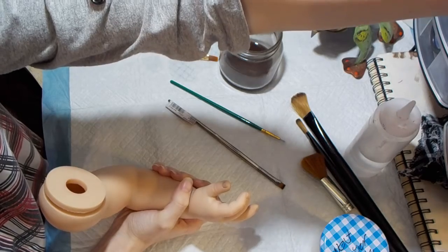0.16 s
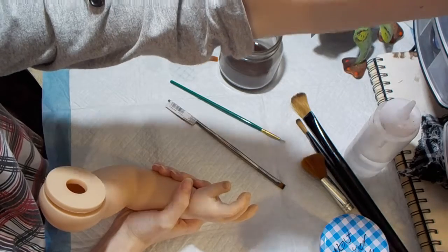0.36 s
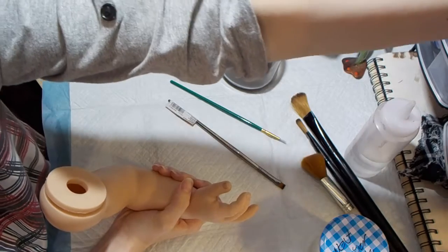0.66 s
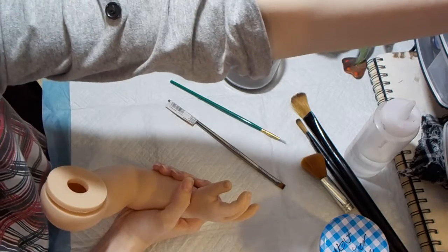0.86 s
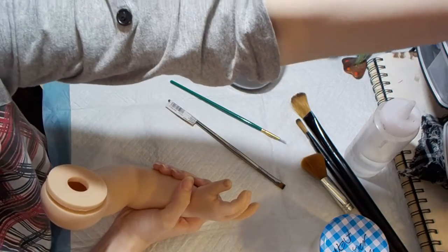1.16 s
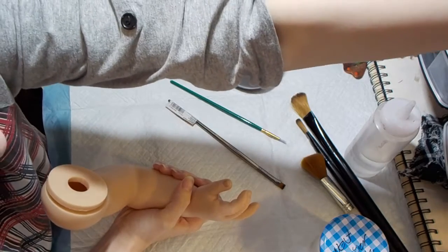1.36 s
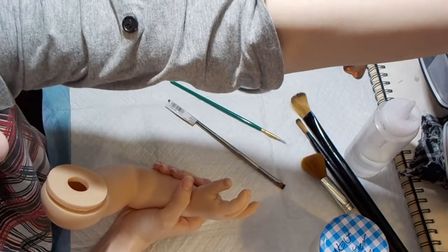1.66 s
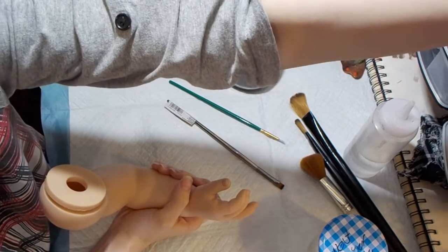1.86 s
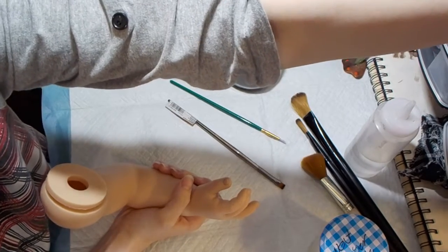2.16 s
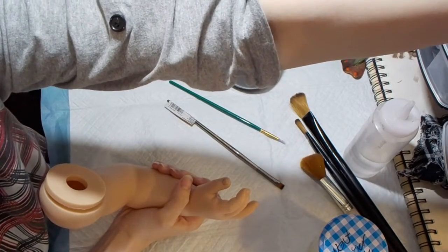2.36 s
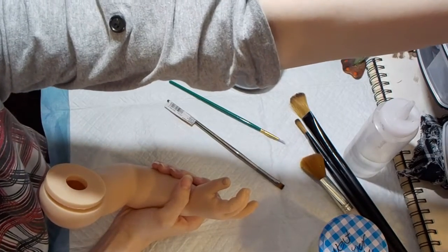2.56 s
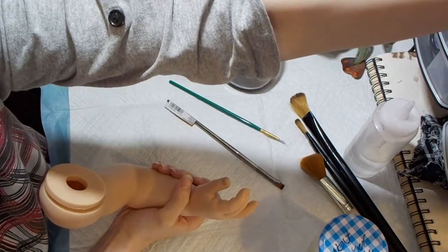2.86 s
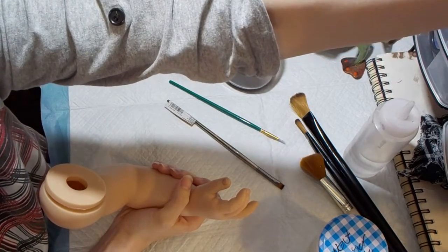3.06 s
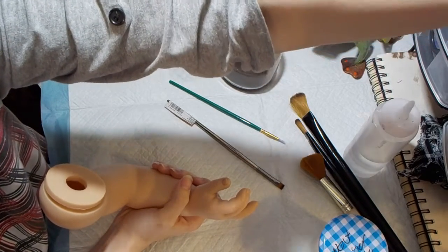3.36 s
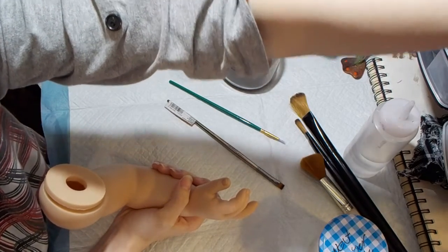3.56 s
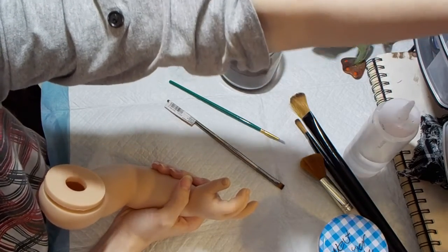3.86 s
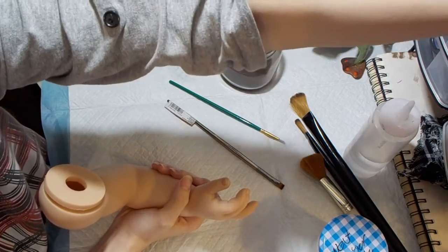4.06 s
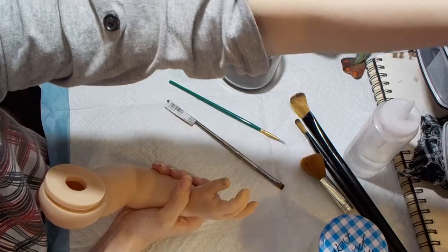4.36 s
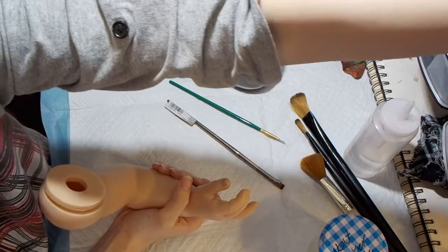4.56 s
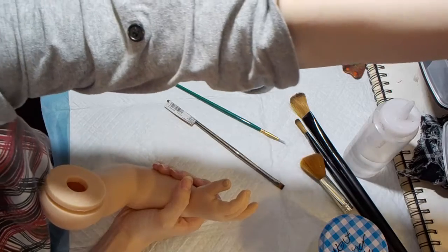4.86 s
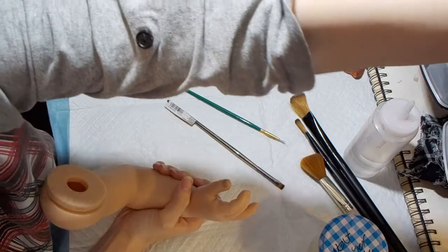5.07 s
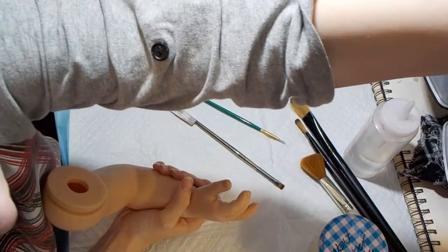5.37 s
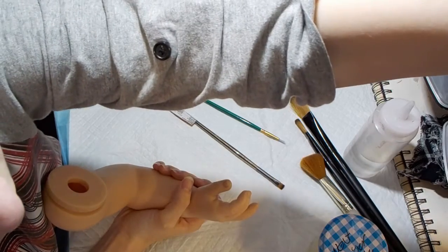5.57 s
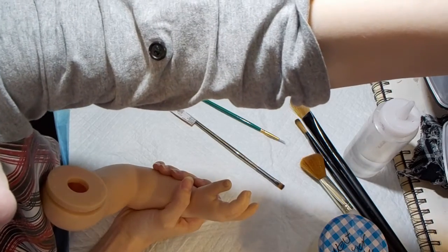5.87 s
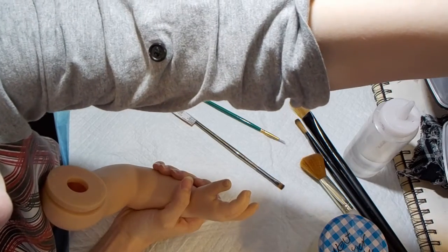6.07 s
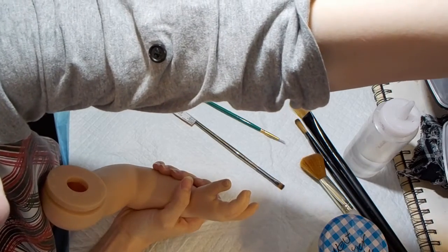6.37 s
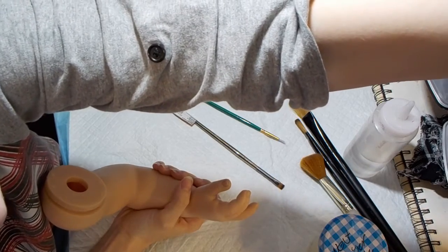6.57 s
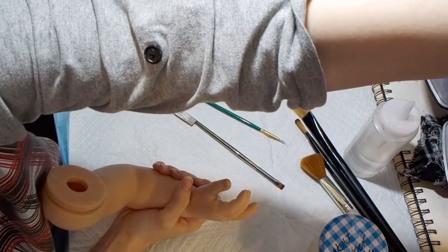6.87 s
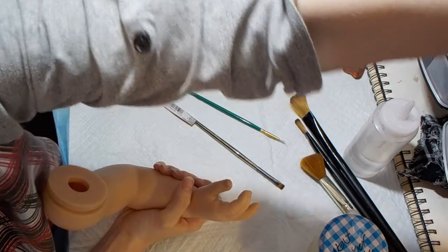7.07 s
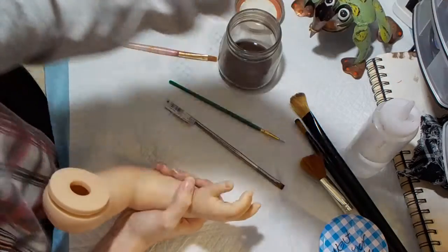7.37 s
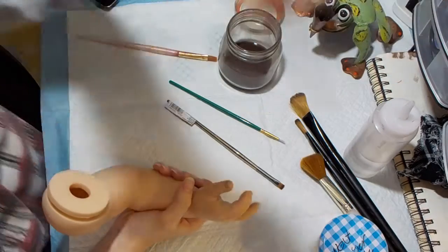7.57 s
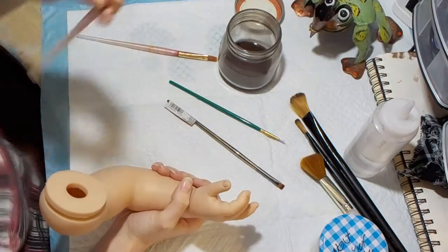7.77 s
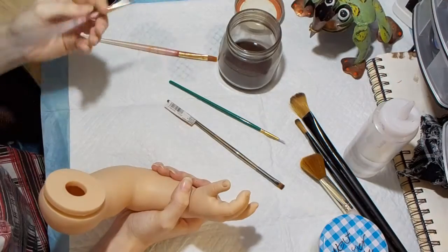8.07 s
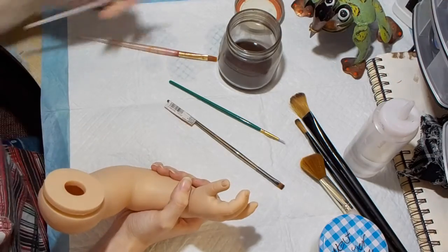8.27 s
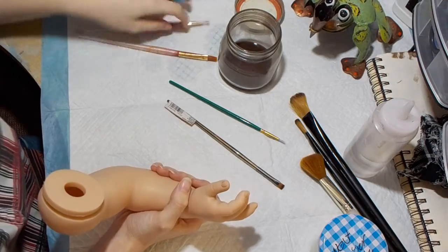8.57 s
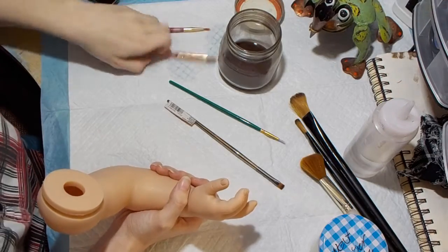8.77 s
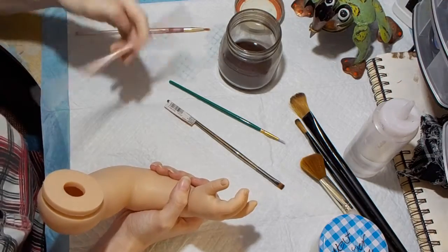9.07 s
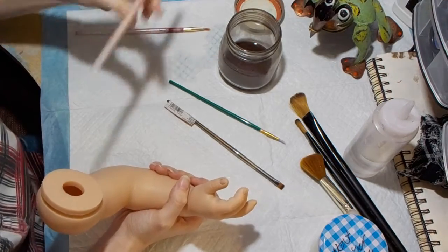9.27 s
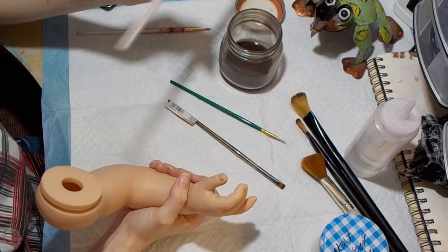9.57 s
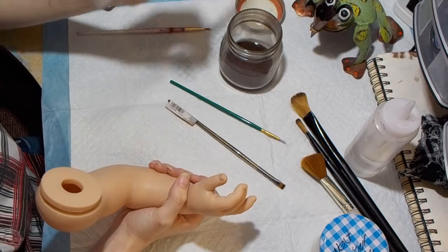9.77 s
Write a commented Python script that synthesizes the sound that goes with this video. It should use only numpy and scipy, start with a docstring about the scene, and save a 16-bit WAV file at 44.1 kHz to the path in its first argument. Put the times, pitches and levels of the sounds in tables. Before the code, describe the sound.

A stick clinks and scrapes inside a small glass jar, with wooden brush handles knocking and rolling on a table.

```python
"""A stick stirs paint in a small glass jar on a padded table, close to a phone in a quiet room.
Its touches ring the paint-damped glass and the filled body; its strokes scrape them by stick-slip.
Brush handles knock and roll on the table top, a metal brush collar ticks, the jar bumps the pad once
and a hand brushes the pad. Short echoes, steady hiss and a faint hum lie behind."""
import sys
import numpy as np
from scipy import signal
from scipy.io import wavfile
from scipy.ndimage import uniform_filter1d

SR = 44100
rng = np.random.default_rng(int(sys.argv[2]) if len(sys.argv) > 2 else 0)


def unload_audio(sound):
    """Save the sound as a 16-bit wav file, at the path given as the first command line argument."""
    columns = np.transpose(np.atleast_2d(sound))
    # keep every value between -1 and 1, then stretch to whole-number steps
    steps = np.round(np.clip(columns, -1, 1) * 32767)
    wavfile.write(sys.argv[1], SR, steps.astype(np.int16))


N = 437031

# Mode tables: (frequency [Hz], t60 [s], level [dB], left-right [dB], left lead [rad])
GLASS_MODES = [(3690, 0.007, -0.5, 8.5, 0.38), (3874, 0.017, -6, -7, -0.9),
               (4092, 0.016, -7.5, -9.5, 0.041), (4460, .02, -21, -3.5, .2), (5150, 0.0096, -13, -9, .3),
               (5358, 0.013, -16.5, 3.5, -0.014), (5730, 0.016, -16, -3, 0.5),
               (6498, 0.014, -17.5, 2, -0.5), (6997, 0.011, -13.5, -3, -0.15)]  # jar wall
BODY_MODES = [(667, 0.039, -7, 0.093, 0.0035), (1065, 0.025, -1, 0.041, 0.0035),
              (1384, 0.02, -0.5, .5, 0.00093), (2040, 0.011, 4, 0.082, 0.0013)]  # filled jar
TICK_MODES = [(9550, 0.0026, 1, -1, .6), (11800, 0.002, -5, -1, 0.4)]  # bright onset of a touch on glass
TABLE_MODES = [(240, .5, -39, 10.5, .8), (383, 0.037, -12, 13.5, 1), (602.7, 0.02, -7.5, 5, -0.047),
               (835, 0.026, -8.5, 8, -1.9), (1068, 0.018, -7.5, 9.5, -1.5), (1406, 0.013, -12.5, 2, -.4),
               (1595, 0.0048, 7.5, 7, 0.45), (3700, 0.0076, -14.5, -13.5, -0.4)]  # table top


def gain_of(db):
    return 10 ** (np.asarray(db) / 20)


def unit_rms(x):
    return x / np.sqrt(np.mean(x ** 2) + 1e-20)


def smooth_noise(width_samples):
    return unit_rms(uniform_filter1d(rng.standard_normal(N), width_samples))


def curve_at(points, hz):
    points_hz, values = np.transpose(points)
    return np.interp(np.log(hz + 1), np.log(points_hz + 1), values)


def octaves_above(modes, hz):
    return np.log2(np.array(modes)[:, :1] / hz)


def add(mix, start_s, sound):
    part = mix[:, round(start_s * SR):][:, :sound.shape[1]]
    part += sound[:, :part.shape[1]]


def ring(modes, samples=2500):
    """Stereo impulse response per mode: builds over a few cycles, then decays."""
    hz, t60_s, db, pan_db, lead_rad = np.transpose(modes)[:, :, None]
    t, side = np.arange(samples) / SR, np.array([.5, -.5])[:, None, None]
    rise = (1 - np.exp(-t * hz * 1.3)) ** 2
    level = gain_of(db + side * pan_db - 60 * t / t60_s)
    return rise * np.sin(2 * np.pi * hz * t + side * lead_rad) * level


def blow(rings, force, peak_db, spot_db=0):
    """A contact force rings the modes, weighted by the struck spot."""
    sound = signal.fftconvolve((rings * gain_of(spot_db)).sum(1), force[None], axes=1)
    return gain_of(peak_db) * sound / abs(sound.mean(0)).max()


def contacts(events, t60_s, chatter, db_per_db):
    """Force per event: unit impulse, then dying slips that scale with event level by db_per_db."""
    levels_db = np.array(events)[:, 1:2]
    noise, spread = rng.standard_normal((len(events), 2, 2500)).transpose(1, 0, 2)
    t, stretch = np.arange(2500) / SR, rng.uniform(.6, 1.15, (len(events), 1))
    force = chatter * noise * gain_of(4 * spread - 60 * t / (t60_s * stretch) + db_per_db * levels_db)
    force[:, 0] = 1
    return force


def pressure(strokes, lift_off_db=-71, roundness=1.56):
    """Each stroke swells from lift-off to its peak and sinks back."""
    t, out = np.arange(N) / SR, np.zeros(N)
    for start_s, length_s, db, rise in strokes:
        part = slice(round(start_s * SR), round((start_s + length_s) * SR))
        corners_s = start_s + length_s * np.array([0, np.clip(rise, .02, .98), 1])
        off_peak = np.interp(t[part], corners_s, [1, 0, 1])
        out[part] += gain_of(db + (lift_off_db - db) * off_peak ** roundness) - gain_of(lift_off_db)
    return out


def rub(level, mode_sets, clump_samples, ring_samples=2500):
    """Dense stick-slip grains in clumps of a few ms drive the modes."""
    clump_db = 6 * np.minimum(smooth_noise(clump_samples), 1.5)
    slips = unit_rms(rng.standard_normal(N) * gain_of(4.5 * rng.standard_normal(N) + clump_db))
    response = 0
    for modes, db in mode_sets:
        shape = ring(modes, ring_samples).sum(1)
        response = response + gain_of(db) * shape / np.linalg.norm(shape.mean(0))
    return signal.oaconvolve((slips * level)[None], response, axes=1)[:, :N]


def room_tone(hiss_db=-64, hum_db=-82.5, hum_hz=370):
    """Hiss of room and electronics with a faint wavering hum."""
    spectrum = [(30, -1), (70, -9), (130, -1.5), (200, -8), (330, -3.5), (1000, -1.5), (4000, -5.5),
                (5500, -12), (16000, -14.5)]  # hiss: (frequency [Hz], level [dB])
    coherence = [(60, 0.94), (240, 0.57), (950, 0.46), (3770, 0.24), (15000, -0.33)]  # left-right likeness: (frequency [Hz], correlation [-1..1])
    frames, hz = N // 256 + 5, np.fft.rfftfreq(1024, 1 / SR)
    left_re, left_im, other_re, other_im, patches = rng.standard_normal((frames, 513, 5)).T
    patches = unit_rms(uniform_filter1d(uniform_filter1d(patches, 12, 0), 14, 1))
    waver_db = 0.62 * patches * (hz[:, None] < 7000)  # the electronic hiss above is even
    alike = curve_at(coherence, hz)[:, None]
    left = left_re + 1j * left_im
    right = alike * left + np.sqrt(1 - alike ** 2) * (other_re + 1j * other_im)
    bins = np.array([left, right]) * gain_of(curve_at(spectrum, hz)[:, None] + waver_db)
    hiss = unit_rms(signal.istft(bins, nperseg=1024, noverlap=768)[1][:, :N])
    hum = gain_of(hum_db + smooth_noise(3000)) * np.sin(2 * np.pi * hum_hz * np.arange(N) / SR)
    return gain_of(hiss_db) * hiss + hum


def echoes(x, t60_s):
    """Sparse reflections of random sign from table, arm and walls."""
    taps = np.zeros((2, 9000))
    delays = np.arange(150, 8980, 20) + rng.integers(0, 20, (2, 442))
    np.put_along_axis(taps, delays, rng.choice([-1., 1.], delays.shape), 1)
    taps *= gain_of(-60 * np.arange(9000) / SR / t60_s)
    return signal.oaconvolve(x, taps / np.linalg.norm(taps[0]), axes=1)[:, :N]


def hand(push_t60_s=0.28):
    """Skin rustles over the paper pad; the wrist settles with soft, uneven pushes."""
    strokes = [(8.49, 0.11, -59, 0.64), (8.73, 0.2, -61.5, 0.38)]  # skin on pad: (start [s], length [s], level [dB], rise [fraction])
    thuds = [(8.572, -54), (8.734, -51)]  # wrist on pad: (time [s], level [dB])
    # pad: (frequency [Hz], t60 [s], level [dB], left-right [dB], left lead [rad])
    rustle_modes = [(894, 0.0035, -1.5, 3, .1), (3950, 0.0034, -2, 1, 0.33), (5900, 0.0014, -1, 1, .3)]
    bass_modes = [(121, 0.096, -2.5, 4.4, .1), (182, 0.044, -1.5, 9.1, .1)]
    out = rub(pressure(strokes), [(rustle_modes, 0)], clump_samples=200)
    fade = gain_of(-60 * np.arange(4000) / SR / push_t60_s)
    for (time_s, db), push in zip(thuds, rng.standard_normal((len(thuds), 4000))):
        add(out, time_s, blow(ring(bass_modes), push * fade, db))
    return out


def handle_rolls():
    """Rolling handles drive the table top with fine grains."""
    rolls = [(1.74, 0.17, -40.5, 0.31), (1.89, 0.49, -54, 0.15), (2.03, 0.081, -51.5, 0.71),
             (2.12, 0.14, -50.5, 0.9), (9.207, 0.13, -47.5, 0.1), (9.3, 0.21, -54, 0.39),
             (9.48, 0.11, -50.5, 0.11)]  # handle on table: (start [s], length [s], level [dB], rise [fraction])
    return rub(pressure(rolls), [(TABLE_MODES, 0)], clump_samples=200, ring_samples=14000)


def handle_knocks(t60_cycles=27):
    """Wooden handles chatter on the table, ringing their own note and the table modes near it."""
    knocks = [(1.613, -38, 735), (1.776, -38, 1730), (1.788, -29, 1670), (1.804, -13.5, 1530),
              (1.829, -32, 1780), (1.849, -20.5, 1510), (1.906, -37, 1780), (1.922, -32, 1630),
              (1.937, -11, 1800), (1.991, -45, 665), (2.045, -25, 1580), (2.077, -29.5, 1660),
              (2.162, -35.5, 1140), (2.177, -38.5, 1430), (2.244, -41.5, 583), (2.29, -31, 1370),
              (2.319, -27.5, 1490), (2.373, -25, 1570), (8.502, -53, 716), (8.574, -45, 668),
              (9.214, -19, 1650), (9.222, -22, 898), (9.231, -15, 1590), (9.234, -17, 1530),
              (9.271, -31, 1760), (9.346, -32, 1160), (9.385, -20, 1280), (9.431, -23.5, 1400),
              (9.443, -9, 1650), (9.45, -23, 1550), (9.491, -27, 1700), (9.5, -18.5, 1085),
              (9.507, -27, 852), (9.514, -21.5, 1650), (9.52, -45.5, 542), (9.579, -36.5, 1613)]  # handle on table: (time [s], level [dB], pitch [Hz])
    spots_db = 2 * rng.standard_normal((len(knocks), len(TABLE_MODES), 1))
    forces = contacts(knocks, t60_s=0.014, chatter=0.14, db_per_db=-3.2)
    out, table_top = np.zeros((2, N)), ring(TABLE_MODES, samples=14000)
    for (time_s, db, hz), force, spot_db in zip(knocks, forces, spots_db):
        handle = ring([(hz, t60_cycles / hz, 0, 7, .2)])
        add(out, time_s, blow(handle, force, db - 9.5 + 6 * (hz < 1000)))  # low notes are clearer
        falloff_db = (9.5 + .15 * (db + 24)) * abs(octaves_above(TABLE_MODES, hz))
        add(out, time_s, blow(table_top, force, db - 3, spot_db - falloff_db))
    return out


def collar_ticks():
    """A metal brush collar ticks, hard and dry; snap weights its modes above 9 kHz."""
    ticks = [(1.723, -20.5, 2), (1.936, -36, -26), (2.373, -39, -6), (2.7118, -26, 5), (5.0065, -42, 6),
             (6.2118, -44, 4), (7.2567, -32.5, 6), (8.839, -48, -8.5), (9.0004, -51.5, -7),
             (9.212, -24, -1), (9.364, -37.5, -8), (9.4441, -21.5, -11), (9.5, -38.5, 3)]  # collar touches: (time [s], level [dB], snap [dB])
    # collar: (frequency [Hz], t60 [s], level [dB], left-right [dB], left lead [rad])
    modes = [(3780, 0.0074, 5, -4.5, 0.086), (4924, 0.0045, -6.5, -7, .1), (6620, 0.0079, -8, -3, .2),
             (10690, 0.0012, 1.5, 6, .5), (13000, 0.0013, 4.5, -1.5, .4)]
    out, collar, is_top = np.zeros((2, N)), ring(modes), np.array(modes)[:, :1] > 9000
    forces = contacts(ticks, t60_s=.014, chatter=0.005, db_per_db=-0.78)
    for (time_s, db, snap_db), force in zip(ticks, forces):
        add(out, time_s, blow(collar, force, db, snap_db * is_top))
    return out


def jar_bump():
    """The jar rocks onto the pad; the soft pulse favours its lowest body mode."""
    bumps = [(5.51, -24)]  # base on pad: (time [s], level [dB])
    out, tilt_db = np.zeros((2, N)), -18 * octaves_above(BODY_MODES, BODY_MODES[0][0])
    for time_s, db in bumps:
        add(out, time_s, blow(ring(BODY_MODES), np.hanning(24), db, tilt_db))
    return out


def stick_scrapes(graze_db=-71, graze_end_s=5.75):
    """The dragged stick drives wall, body and a gritty top; while stirring it grazes between strokes."""
    strokes = [(0.03, 0.23, -28.5, 0.43), (.52, 0.27, -37.5, 0.39), (.73, 0.15, -24.5, 0.39),
               (1.237, 0.054, -31.5, 0.62), (1.598, 0.046, -41, 0.76), (1.708, 0.17, -45.5, 0.27),
               (2.688, 0.23, -44, 0.097), (3.19, 0.28, -31, 0.14), (3.27, 0.16, -33, 0.24),
               (3.36, 0.1, -34.5, 0.33), (3.66, 0.22, -41, 0.32), (3.77, 0.15, -28.5, 0.39),
               (4.33, 0.18, -41.5, 0.11), (4.57, 0.16, -43, 0.15), (4.85, 0.18, -50.5, 0.33),
               (5.07, .13, -40, 0.74), (5.18, 0.087, -41.5, 0.48), (5.24, 0.27, -45, 0.22),
               (5.436, 0.16, -34, 0.42), (5.57, 0.14, -48.5, 0.64), (6.208, 0.059, -40.5, 0.1),
               (6.9, .25, -41, 0.8)]  # stick on wall: (start [s], length [s], level [dB], rise [fraction])
    graze = gain_of(graze_db + 9.2 * smooth_noise(1500)) * (np.arange(N) < graze_end_s * SR)
    mode_sets = [(GLASS_MODES, -3), (BODY_MODES, -17), (TICK_MODES[:1], -28)]  # (modes, level [dB])
    return rub(pressure(strokes) + graze, mode_sets, clump_samples=130)


def stick_clinks(rebound_db=-19, rebound_s=0.037):
    """Each touch rings the glass wall at a new spot, the filled body and a short bright tick."""
    touches = [(0.092, -25, -23), (.117, -42, -30), (0.1287, -32, -39), (0.155, -20, -39),
               (0.167, -17, -21), (0.264, -41, -15.5), (0.3313, -42.5, -27), (.5935, -46, -2),
               (0.6094, -14.5, -19), (0.6497, -22, -14.5), (0.7856, -7, -33), (.7872, -5.5, -24),
               (0.7913, -15, -41), (0.7941, -7, -31), (0.926, -32, -17.5), (1.263, -23.5, -20),
               (1.4245, -35.5, -17.5), (1.5132, -42, -14.5), (1.6247, -31.5, -30), (1.679, -37, -15),
               (1.723, -3.5, -30), (1.7585, -16, -28), (2.1925, -43, -8), (2.307, -33, -5),
               (2.498, -36.5, -35), (2.617, -36, -12), (2.665, -37, -16.5), (2.701, -26, -21),
               (2.7105, -4, -43), (2.737, -13.5, -40), (2.751, -17.5, -45), (2.7598, -24.5, -30),
               (3.2498, -25.5, -11.5), (3.268, -17.5, -15.5), (3.3118, -18, -13.5), (3.3272, -14.5, -15.5),
               (3.3963, -20.5, -34), (3.713, -20.5, -28), (3.769, -29, -14), (3.8298, -12, -32),
               (4.188, -37, -15.5), (4.2112, -36.5, -30), (4.2784, -40.5, -6), (4.3068, -40.5, -18),
               (4.342, -26, -14.5), (4.3527, -12, -26.5), (4.377, -29, -31), (4.405, -31.5, -34),
               (4.557, -29.5, -19.5), (4.588, -23, -29), (4.7395, -39, -12.5), (4.9293, -29.5, -17.5),
               (5.006, -24, -21), (5.077, -36, -31), (5.1097, -38, -16.5), (5.1533, -20, -24.5),
               (5.192, -30.5, -16), (5.221, -16.5, -37), (5.2886, -28.5, -18.5), (5.3363, -41, -22),
               (5.365, -34, -13), (5.393, -34, -18), (5.4514, -16, -27), (5.485, -21.5, -17),
               (5.4965, -18.5, -15), (5.5097, -14, -13), (5.5497, -28.5, -15.5), (5.6007, -36, -19),
               (5.622, -36, -16), (5.677, -32, -16.5), (6.0184, -45, -11.5), (6.211, -31, -16),
               (6.557, -45, -10), (6.9141, -34, -17.5), (7.052, -31, -15), (7.069, -18.5, -19),
               (7.1, -30.5, -17), (7.261, -36.5, -15)]  # stick on glass: (time [s], level [dB], body re wall [dB])
    spots_db = 3 * rng.standard_normal((len(touches), len(GLASS_MODES), 1))
    detunes = 1 + .02 * rng.standard_normal((len(touches), len(GLASS_MODES)))  # moving paint
    forces = contacts(touches, t60_s=0.049, chatter=0.028, db_per_db=1.05)
    gaps_s = np.diff(np.array(touches)[:, 0], prepend=-1)
    wall_octaves = octaves_above(GLASS_MODES, GLASS_MODES[0][0])
    body_octaves = octaves_above(BODY_MODES, BODY_MODES[0][0])
    out, body, tick = np.zeros((2, N)), ring(BODY_MODES), ring(TICK_MODES)
    for i, (time_s, db, body_db) in enumerate(touches):
        wall = ring([(hz * ratio, *rest) for (hz, *rest), ratio in zip(GLASS_MODES, detunes[i])])
        wall_tilt_db = -0.17 * (db + 33.5) * wall_octaves  # firm blows favour low modes
        body_tilt_db = -1.1 * (body_db + 16.5) * body_octaves  # lower when the body takes more
        dulling_db = rebound_db * np.exp(-gaps_s[i] / rebound_s)  # quick rebounds tick less
        add(out, time_s, blow(wall, forces[i], db, spots_db[i] + wall_tilt_db))
        add(out, time_s, blow(body, forces[i], db + body_db, body_tilt_db))
        add(out, time_s, blow(tick, forces[i], -29.5 + 0.74 * (db + 5) + dulling_db))
    return out


def scene():
    """Jar and table with their echoes over the room tone."""
    table = handle_knocks() + handle_rolls() + hand()
    bass_cut = signal.butter(2, 520, "high", fs=SR, output="sos")  # a small jar radiates little bass
    jar = signal.sosfilt(bass_cut, stick_clinks() + jar_bump() + collar_ticks() + stick_scrapes())
    return jar + table + echoes(gain_of(-12) * jar + gain_of(-19) * table, t60_s=0.07) + room_tone()


def record(dry):
    """Minimum-phase tone colour: no bass, deep notches near 2.5 and 8.2 kHz; then a 16 kHz band limit."""
    response = [(80, -29.5), (340, -1.5), (1800, -2), (2050, -9.5), (2250, -28.5), (2800, -22.5),
                (3100, -24.5), (3300, -13), (3600, -1.5), (6500, 0), (7200, -7.5), (8200, -29), (8700, -9),
                (10000, 2)]  # tone colour: (frequency [Hz], level [dB])
    log_gain = np.log(gain_of(curve_at(response, abs(np.fft.fftfreq(4096, 1 / SR)))))
    colour = np.fft.ifft(np.exp(np.conj(signal.hilbert(log_gain)))).real[:2048]
    heard = signal.oaconvolve(dry, colour[None], axes=1)[:, :N]
    low_pass = signal.firwin(511, 16000, window=("kaiser", 9), fs=SR)
    return signal.oaconvolve(heard, low_pass[None], "same")


dry = scene()
out = record(dry)
unload_audio(out)
```